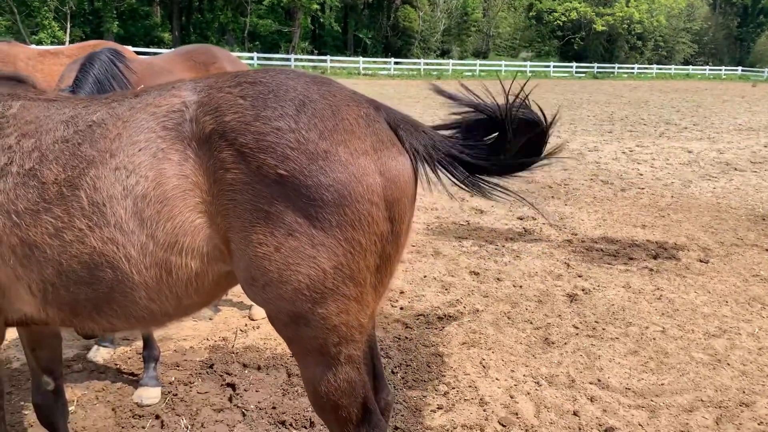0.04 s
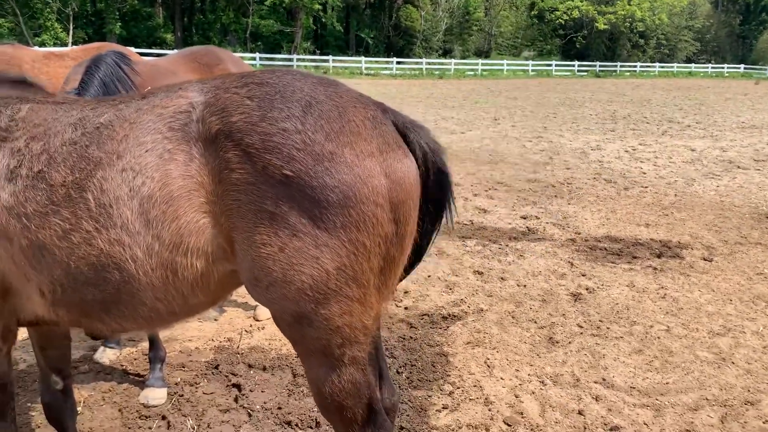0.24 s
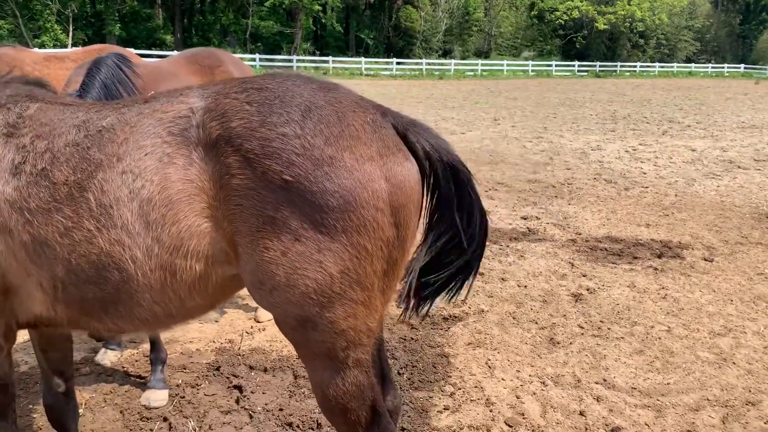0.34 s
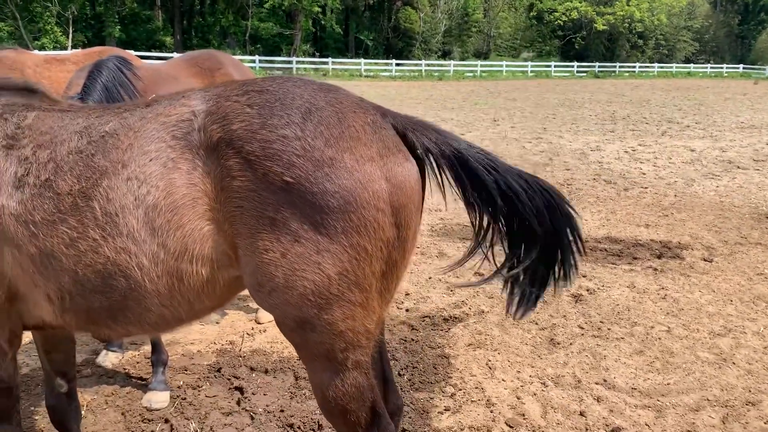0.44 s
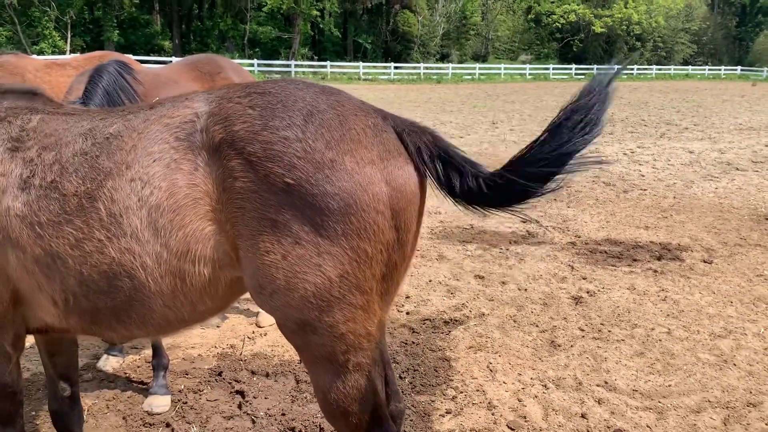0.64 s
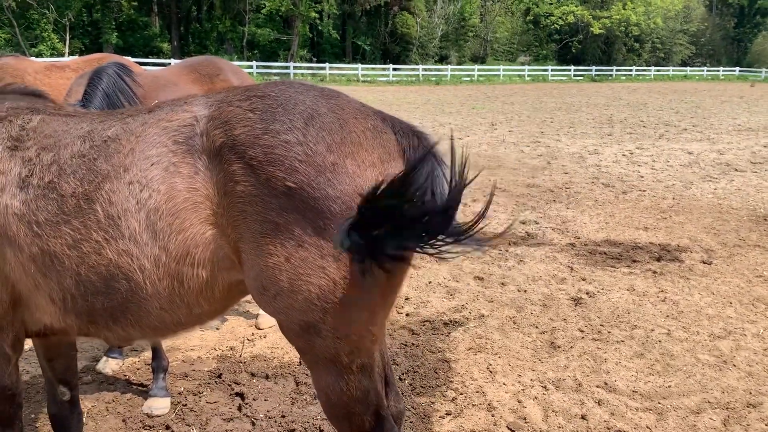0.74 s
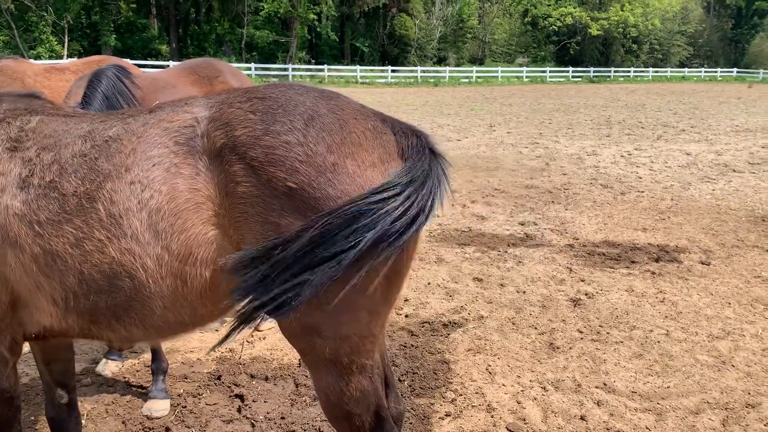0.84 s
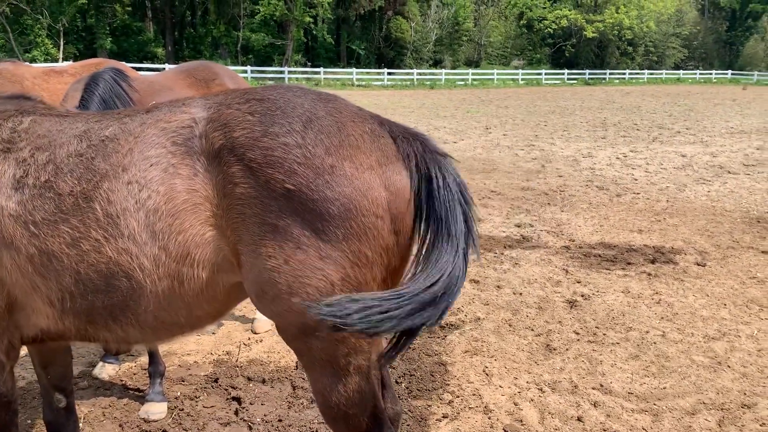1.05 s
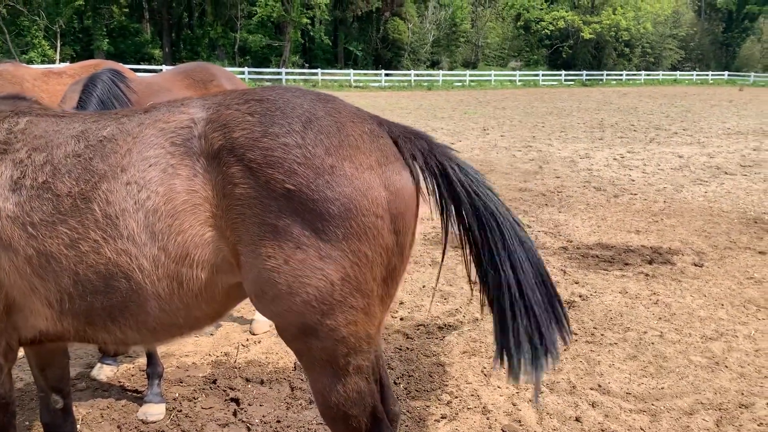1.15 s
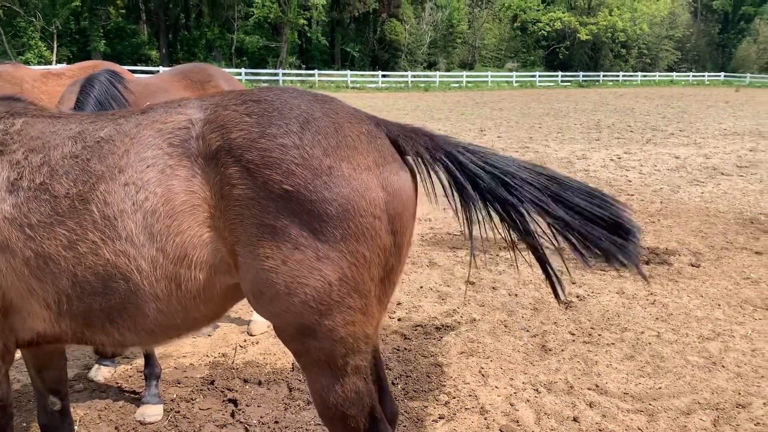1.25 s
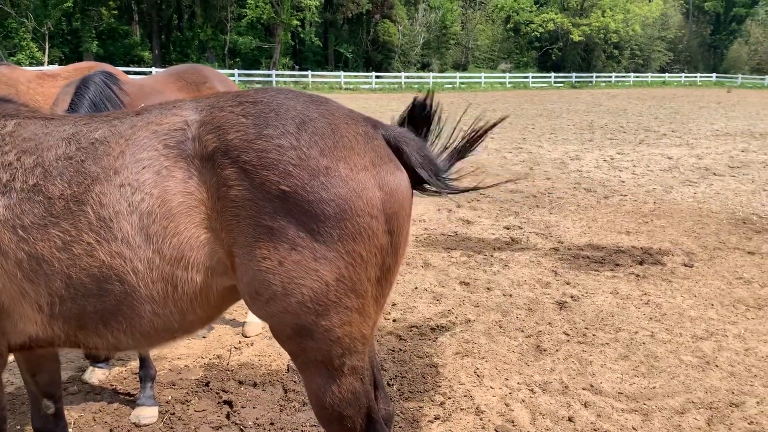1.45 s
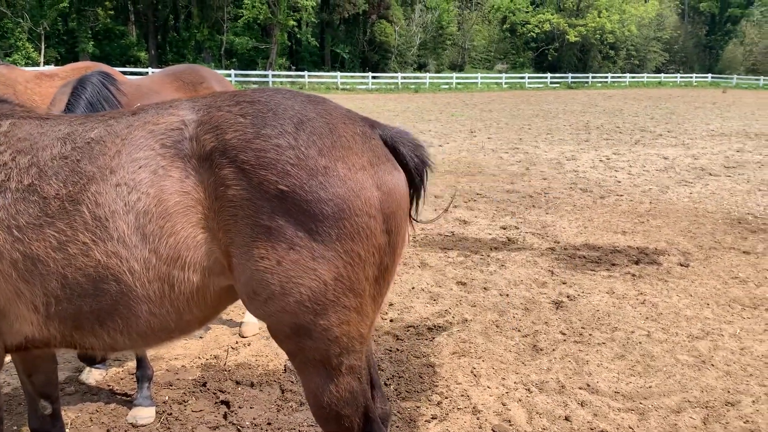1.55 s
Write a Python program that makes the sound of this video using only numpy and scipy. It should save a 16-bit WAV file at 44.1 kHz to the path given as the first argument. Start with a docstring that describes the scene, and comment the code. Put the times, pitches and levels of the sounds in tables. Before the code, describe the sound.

A horse swishes its tail close by in an outdoor paddock. Irregular bright, hissing strokes each carry a thin jingle like a fine chain, then grow weaker. Soft thuds and a faint wind rumble lie beneath.

```python
"""A low rumble of wind and a dry rustle of hair open the scene: a horse swishes its tail in a sandy paddock.
Irregular bright swishes follow, each a burst of tiny contacts whose impulses add up to a hiss.
Each carries a thin metallic ring, as of a fine chain or clasp shaken close by: groups of narrow modes
sounding together. Soft, damped thuds with a scuff of sand lie beneath; snaps and pings stand out."""
import sys
import numpy as np
from scipy import signal
from scipy.fft import rfft, irfft, next_fast_len
from scipy.io import wavfile
from scipy.ndimage import uniform_filter1d, map_coordinates

SR = 44100
rng = np.random.default_rng(int(sys.argv[2]) if len(sys.argv) > 2 else 0)


def wav_out(sig):
    """Save sig, one row per channel (or a flat mono array), as 16-bit PCM at SR to the path in sys.argv[1]."""
    wavfile.write(sys.argv[1], SR, np.round(np.clip(np.atleast_2d(sig).T, -1, 1) * 32767).astype(np.int16))


N = 70560
TIME = np.arange(N) / SR
LEFT_RIGHT = np.array([[.5], [-.5]])  # splits a left-minus-right difference between the channels

def amp(db):
    """Amplitude ratio: tenfold for every 20 dB."""
    return 10 ** (np.asarray(db) / 20)

def unit(x):
    """Normalisation to rms 1."""
    return x / np.sqrt(np.mean(x ** 2) + 1e-20)

def along(points, hz):
    """Interpolation on a logarithmic frequency axis."""
    f, values = np.transpose(points)
    return np.interp(np.log(hz + 1), np.log(f + 1), values)

def envelope(rows):
    """Amplitude envelope, linear in decibels between its points."""
    return amp(np.interp(TIME, *np.transpose(rows)))

def burst(start, rise, t60):
    """Linear attack, then exponential decay of 60 dB in t60 seconds."""
    shape = np.zeros(N)
    live = np.arange(int(start * SR), min(int((start + rise + 2 * t60) * SR), N))
    t = live / SR - start
    shape[live] = np.clip(t / rise, 0, 1) * amp(-60 * np.maximum(t - rise, 0) / t60)
    return shape

def wobble(knots_per_s):
    """Smooth random modulation: a spline through Gaussian values."""
    return map_coordinates(rng.standard_normal(4096), [TIME * knots_per_s], mode="wrap")

def filtered(x, response):
    """Linear filtering: the spectrum times a complex frequency response."""
    size = next_fast_len(N + SR // 2)
    return irfft(rfft(x, size) * response(np.fft.rfftfreq(size, 1 / SR)), size)[..., :N]

def spread(pair, spectrum, correlation):
    """Partial coherence: two independent signals, coloured and mixed as mid and side; rms 1."""
    def weights(hz):
        angle = np.arccos(np.clip(along(correlation, hz), -1, 1)) / 2
        return amp(along(spectrum, hz)) * np.array([np.cos(angle), np.sin(angle)])
    mid, side = filtered(pair, weights)
    return unit(np.array([mid + side, mid - side]))

def noise(spectrum, correlation):
    """Coloured, partly coherent Gaussian noise in stereo; rms 1."""
    return spread(rng.standard_normal((2, N)), spectrum, correlation)

def patchy(x, depth_db=5):
    """Random modulation over frequency and time gives brief glints and dips; rms 1."""
    cells = signal.stft(x, nperseg=512)[2]
    field = uniform_filter1d(rng.standard_normal(cells.shape[1:]), size=3, axis=0)
    field = uniform_filter1d(field, size=5, axis=1)
    return unit(signal.istft(cells * amp(depth_db * unit(field)), nperseg=512)[1][:, :N])

# Spectra of the rumble and the breeze: f/Hz, relative level/dB
RUMBLE_SPECTRUM = [(15, -18), (25, -1.5), (40, -11.5), (60, 4), (80, -2), (108, -1), (140, -11.5),
                   (200, -9), (300, -16), (900, -104)]
BREEZE_SPECTRUM = [(100, 3.5), (200, 0.5), (400, -2.5), (700, -4.5), (1000, -2.5), (1400, -11),
                   (2200, -22.5), (3500, -20.5), (8000, -30), (16000, -16)]
# Their envelopes: t/s, relative level/dB
RUMBLE_ENVELOPE = [(0.0, -67), (0.146, -50), (0.258, -56), (0.346, -50), (0.686, -54.5), (0.83, -51),
                   (0.882, -57), (0.94, -50), (1.242, -57.5), (1.3, -50), (1.42, -54), (1.6, -51.5)]
BREEZE_ENVELOPE = [(0.0, -59), (0.114, -58), (0.298, -57), (0.552, -61.5), (1.6, -65.5)]
# Coherence of the breeze, shared by the thuds' scuff: f/Hz, left-right correlation
AIR_CORRELATION = [(60, 0.97), (250, 0.62), (550, 0.41), (1000, -0.35), (3000, -0.53)]

def wind(rumble_db=-0.5, breeze_db=4):
    """Amplitude-modulated noise: a gusting, nearly coherent rumble under a slowly easing breeze."""
    rumble = envelope(RUMBLE_ENVELOPE) * noise(RUMBLE_SPECTRUM, correlation=[(60, 0.99), (200, 0.79)])
    breeze = envelope(BREEZE_ENVELOPE) * noise(BREEZE_SPECTRUM, AIR_CORRELATION)
    return amp(rumble_db) * rumble + amp(breeze_db) * breeze

# Spectrum of the rustle: f/Hz, relative level/dB
HAIR_SPECTRUM = [(500, 11), (1000, -13.5), (1600, 5.5), (2800, 1), (3900, -6.5), (5000, -1.5), (7000, -14),
                 (9000, -33.5), (15000, -11.5)]
# Its envelope: t/s, relative level/dB
HAIR_ENVELOPE = [(0.0, -66), (0.512, -56.5), (0.524, -63.5), (0.704, -61.5), (0.778, -66.5), (0.81, -67),
                 (0.934, -64), (0.943, -56.5), (0.992, -67), (1.104, -61), (1.176, -77), (1.198, -59),
                 (1.22, -74), (1.362, -70), (1.524, -76), (1.6, -74)]

def hair(gain_db=2):
    """Friction noise: the tail sweeps through the air and over the coat with a dry, clumpy rustle."""
    rustle = noise(HAIR_SPECTRUM, correlation=[(1000, 0.33), (2500, 0.51), (5000, 0.8)])
    return amp(gain_db) * envelope(HAIR_ENVELOPE) * patchy(rustle)

def contacts(per_s=3500, spread_db=5):
    """Shot noise: two streams of tiny random impacts of log-normal size; rms 1."""
    hits = rng.random((2, N)) < per_s / SR
    polarity = np.sign(rng.standard_normal((2, N)))
    return unit(hits * polarity * amp(spread_db * rng.standard_normal((2, N))))

def ring(modes, flicker_db=2, flicker_per_s=76):
    """Random excitation: modes kept ringing by many contacts wander in pitch and flicker; rms 1."""
    total = 0
    for hz, width, db in modes:
        strength = amp(db + flicker_db * wobble(flicker_per_s))
        cycles = np.cumsum(hz + width * wobble(2 * width)) / SR + rng.random()
        total += strength * np.sin(2 * np.pi * cycles)
    return unit(total)

# Strokes of the tail: t/s, rise/s, t60/s, relative level/dB of the top ring, middle ring,
# low ring and hiss, f/Hz of the low ring
SWISHES = [ (0.016, 0.0077, 0.38, -71, -87, -83, -61.5, 5460), (0.136, 0.02, 1, -61, -61, -72, -54.5, 6040),
           (0.187, 0.011, 0.075, -39, -37, -58.5, -47, 5620),
           (0.224, 0.014, 0.13, -29.5, -37.5, -41.5, -43, 5610),
           (.264, 0.013, 0.045, -35, -71, -60, -59, 5680), (0.322, 0.0047, 0.27, -41, -38, -57, -56, 5800),
           (0.339, 0.0049, 0.24, -28.5, -41, -49, -57, 5520),
           (0.353, 0.0054, 0.11, -17.5, -24.5, -49.5, -43, 5490),
           (0.375, 0.0044, 0.082, -23, -31.5, -43.5, -40.5, 5640),
           (0.42, 0.0031, 0.22, -39, -37.5, -48, -45, 5740),
           (0.4565, 0.0046, 0.14, -26.5, -34, -44.5, -40, 5750),
           (0.491, 0.011, 0.062, -31, -38, -53, -42, 5780), (0.538, 0.0061, 0.26, -65, -51, -59, -54, 5750),
           (0.56, 0.0066, 0.36, -38, -42, -55, -50.5, 5750),
           (0.585, 0.0061, 0.079, -22.5, -32.5, -46.5, -40.5, 5725),
           (.614, 0.0085, 0.044, -27.5, -63, -62, -62, 5750),
           (.634, 0.0028, 0.086, -45, -45, -66, -60, 5750),
           (.672, 0.00089, 0.13, -29, -32.5, -43.5, -41, 5450),
           (0.678, 0.0083, 0.091, -26, -33.5, -41.5, -41.5, 5800),
           (.727, 0.0047, 0.11, -50, -62, -61, -49, 5620),
           (0.779, 0.007, 0.32, -28.5, -41, -54.5, -46.5, 5800),
           (0.8194, 0.0029, 0.057, -10, -32, -33.5, -36, 5464),
           (0.822, 0.019, 0.059, -32.5, -20, -47.5, -42, 5534),
           (0.87, 0.011, 0.22, -44, -40.5, -49.5, -49, 5630),
           (0.909, 0.0033, 0.048, -34.5, -39, -58, -40, 6100),
           (0.939, 0.0018, 0.3, -61.5, -69, -81, -48.5, 5900),
           (1.015, 0.0024, 0.17, -37.5, -37, -47, -54, 5580),
           (1.061, 0.0031, 0.36, -59.5, -76, -86, -56.5, 5600),
           (1.104, 0.0034, 0.21, -33.5, -42, -47, -52.5, 5400),
           (1.148, 0.011, 0.15, -33.5, -43, -46.5, -56, 5655),
           (1.195, 0.0029, 0.024, -58.5, -72, -63.5, -48.5, 5660),
           (1.285, 0.0081, 0.19, -45, -51.5, -58.5, -65, 5600),
           (1.405, 0.00082, 0.12, -51, -54, -64.5, -49.5, 5450),
           (1.442, 0.0022, 0.18, -52, -80.5, -67, -58, 5700),
           (1.477, 0.014, 0.076, -56, -62.5, -71, -62.5, 5370)]
TOP, MIDDLE, LOW, HISS = range(4)  # the four level columns

def swish_envelope(column, scatter_db=0):
    """Incoherent addition: overlapping swishes sum in power, each within scatter_db of its level."""
    offsets_db = scatter_db * rng.uniform(-1, 1, len(SWISHES))
    power = sum((amp(levels[column] + offset) * burst(start, rise, t60)) ** 2
                for (start, rise, t60, *levels, _), offset in zip(SWISHES, offsets_db))
    return np.sqrt(power)

# Spectrum of the hiss: f/Hz, relative level/dB
HISS_SPECTRUM = [(1500, -28), (2800, -10.5), (3900, -9), (5000, -8.5), (6000, -4), (7200, -5.5),
                 (8400, -3.5), (9600, -.5), (11000, 3), (12700, 1), (13500, 8.5), (14500, -7),
                 (15600, 10.5), (16200, -27)]
# Coherence of hiss and snaps: f/Hz, left-right correlation
HISS_CORRELATION = [(2000, 1), (5000, 1), (7200, 1), (8400, 0.87), (9600, 1), (11000, 0.6), (15000, .93)]

def hiss(gain_db=0.5):
    """Superposed impulses: the tiny contacts of each swish merge into a crackling hiss."""
    strength = amp(gain_db) * swish_envelope(HISS)
    return strength * patchy(spread(contacts(), HISS_SPECTRUM, HISS_CORRELATION))

# The two upper groups of metallic modes: f/Hz, width/Hz, relative level/dB
TOP_MODES = [(15135, 45, 0), (15110, 170, -6), (15320, 90, -9), (15705, 45, -7), (14750, 300, -17)]
MIDDLE_MODES = [(11889, 28, 0), (11900, 220, -3), (12390, 55, -5), (12575, 50, -2)]

def bright_ring(gain_db=-1.5):
    """Modal superposition: each swish excites the upper modes in a different balance."""
    total = 0
    for modes, column in (TOP_MODES, TOP), (MIDDLE_MODES, MIDDLE):
        group = sum(amp(db) * swish_envelope(column, scatter_db=2) * ring([(hz, width, 0)])
                    for hz, width, db in modes)
        total += group / np.linalg.norm([amp(db) for _, _, db in modes])
    return amp(gain_db) * total

# The lowest metallic modes before shifting: f/Hz, width/Hz, relative level/dB
LOW_MODES = [(5600, 55, 0), (5700, 220, -4), (6150, 200, -13)]

def low_ring(incoherent_db=3, pan_db=-5):
    """Frequency shifting: the lowest modes, louder on the right, take a new pitch in each swish."""
    incoherent = amp(incoherent_db) * np.array([ring(LOW_MODES), ring(LOW_MODES)])
    analytic = signal.hilbert(unit(ring(LOW_MODES) + incoherent))
    shifts = 0
    for start, rise, t60, *levels, hz in SWISHES:
        rotation = np.exp(2j * np.pi * (hz - LOW_MODES[0][0]) * (TIME - start))
        shifts += amp(levels[LOW]) * burst(start, rise, t60) * rotation
    return np.real(analytic * shifts) * amp(pan_db * LEFT_RIGHT)

# Soft thuds and hollow knocks: t/s, f/Hz, level/dB, t60/s
THUDS = [(0.123, 247, -40, 0.074), (.234, 423, -43.5, 0.01), (0.314, 269, -29.5, 0.051),
         (.314, 897, -46.5, 0.042), (0.425, 876, -44.5, 0.013), (.508, 272, -32.5, 0.052),
         (0.54, 137, -43, 0.05), (0.605, 157.6, -40.5, 0.082), (0.744, 129, -40.5, 0.06),
         (0.819, 179, -40.5, 0.062), (.820, 398, -52.5, 0.04), (.915, 200, -48.5, 0.21),
         (.985, 395, -46.5, 0.025), (1.059, 132, -41.5, 0.072), (1.368, 193.7, -49.5, 0.13),
         (1.376, 808, -51.5, 0.028)]
# Spectrum of their scuff in the sand: f/Hz, relative level/dB
SCUFF_SPECTRUM = [(100, -10), (300, 1), (600, -0.5), (900, -11), (1400, -13), (4000, -49)]

def thuds(rise_s=0.0052, scuff_db=-14.5, left_lead_s=0.0002, pan_db=2.5):
    """Damped oscillation: each knock is a low tone with a scuff, earlier and louder on the left."""
    scuff = amp(scuff_db) * noise(SCUFF_SPECTRUM, AIR_CORRELATION)
    knocks = 0
    for start, hz, db, t60 in THUDS:
        tone = np.sin(2 * np.pi * hz * (TIME - start))
        knocks += amp(db) * burst(start, rise_s, t60) * (tone + scuff)
    placed = filtered(knocks, lambda hz: np.exp(2j * np.pi * hz * left_lead_s * LEFT_RIGHT))
    return placed * amp(pan_db * LEFT_RIGHT)

# Sharp snaps: t/s, level/dB
SNAPS = [(.2275, -59), (.3545, -44), (0.36, -38), (.4236, -61), (0.4583, -45), (0.5076, -47), (0.5854, -54),
         (0.673, -46), (0.6842, -33), (0.779, -52), (0.793, -48), (0.8174, -33.5), (0.912, -52),
         (0.943, -39), (1.016, -48), (1.198, -56), (1.4084, -46)]
# Their spectrum: f/Hz, relative level/dB
SNAP_SPECTRUM = [(1500, -28), (3000, -9), (6000, -14), (10000, 3), (15500, 7.5), (16500, -22)]

def snaps(rise_s=0.0004, t60_s=0.015):
    """Broadband transients: the quickest lashes begin with a crack."""
    strength = sum(amp(db) * burst(start, rise_s, t60_s) for start, db in SNAPS)
    return strength * noise(SNAP_SPECTRUM, HISS_CORRELATION)

# Thin pings and clinks: t/s, rise/s, t60/s, f/Hz, width/Hz, level/dB
PINGS = [(0.238, .001, 0.037, 5870, 144, -54), (0.3555, 0.0008, 0.053, 5630, 119.4, -32),
         (0.422, 0.0011, 0.029, 5760, 424, -40), (0.49, .001, 0.019, 5670, 120, -34.5),
         (.683, 0.0014, 0.022, 5930, 200, -45), (.727, 0.0094, 0.03, 9900, 244, -57),
         (.876, .002, .06, 5690, 87.6, -50), (0.941, 0.0018, 0.054, 2060, 50, -57),
         (0.94, 0.0017, 0.19, 2622, 300, -64), (.993, 0.0066, 0.25, 10250, 120, -59.5),
         (1.094, 0.014, 0.14, 9960, 204, -54.5), (1.192, 0.011, 0.077, 2670, 127, -68.5),
         (1.440, 0.015, 0.13, 9030, 588, -58), (1.478, 0.013, 0.087, 14500, 44.5, -44.5)]

def pings():
    """Narrow-band resonance: single modes ring briefly and decay, apart from the swishes."""
    return sum(amp(db) * burst(start, rise, t60) * ring([(hz, width, 0)])
               for start, rise, t60, hz, width, db in PINGS)

# Phase difference across the microphone's housing: f/Hz, lead of the left channel/rad
HOUSING_PHASE = [(0, 0), (2800, 0), (3800, 3.1), (4700, .5), (5600, 2.9), (6600, -.2), (7200, 0),
                 (7900, -3), (8700, -3.3), (10400, -6.1), (11200, -6.4), (13400, -9.4), (15100, -11.9),
                 (16000, -12.7)]

def from_right(x):
    """Diffraction: sound from the right bends round the housing, so its top treble is late on the left."""
    return filtered(x, lambda hz: np.exp(1j * np.interp(hz, *np.transpose(HOUSING_PHASE)) * LEFT_RIGHT))

def scene():
    """Free-field superposition: the sources add in open air, without echo."""
    swishes = bright_ring() + hiss() + low_ring()
    return from_right(swishes + snaps() + pings()) + hair() + thuds() + wind()

def record(dry, cutoff_hz=16500):
    """Band limiting: a steep low-pass removes the highest treble."""
    return filtered(dry, lambda hz: 1 / (1 + (hz / cutoff_hz) ** 120))

dry = scene()
out = record(dry)
wav_out(out)
```